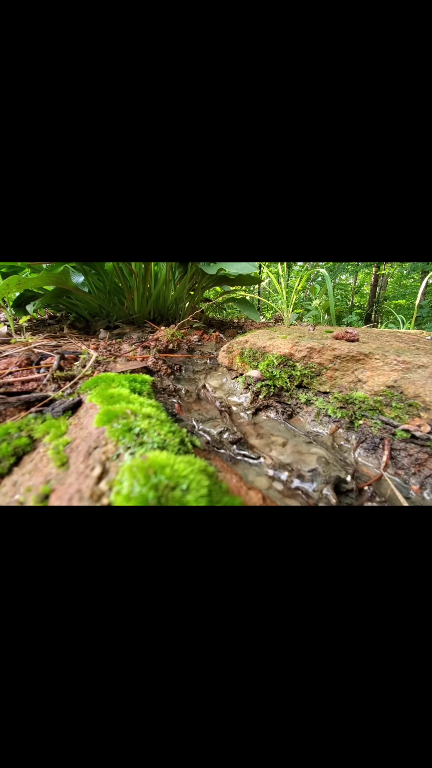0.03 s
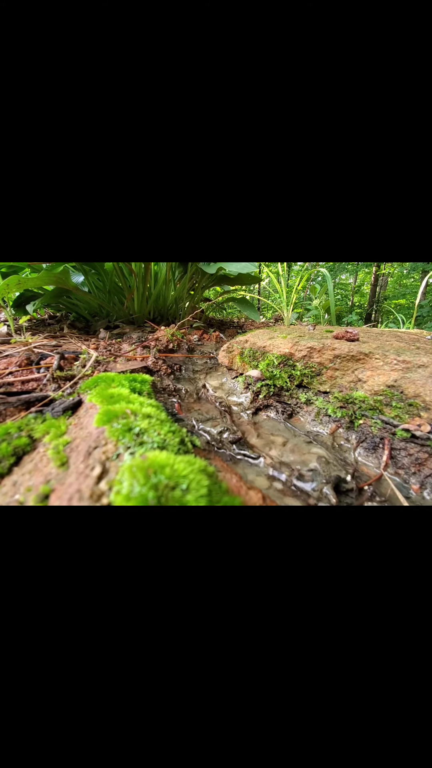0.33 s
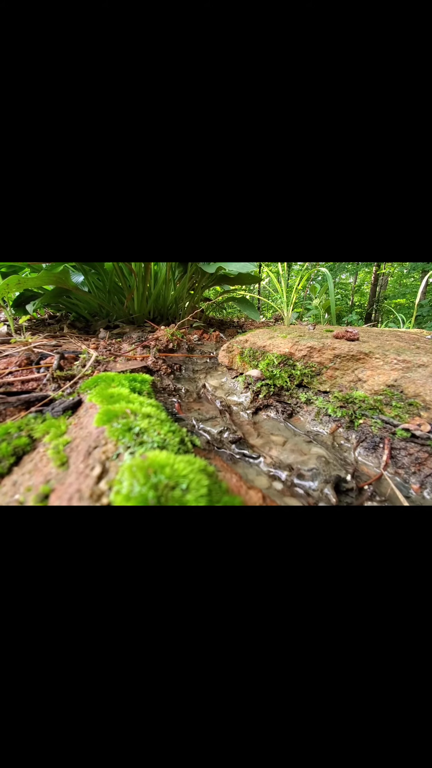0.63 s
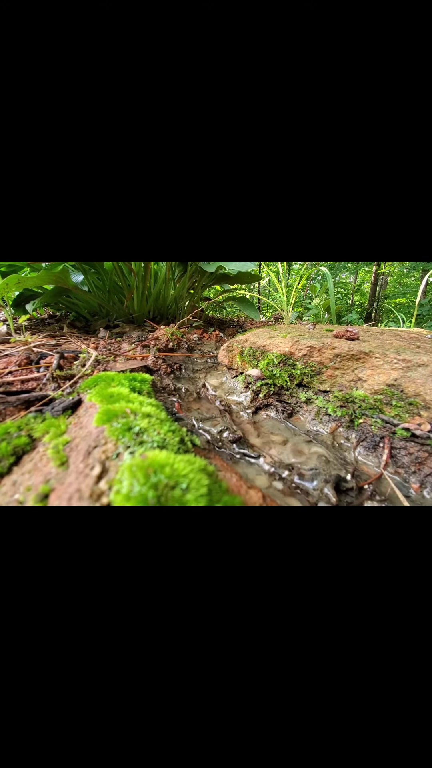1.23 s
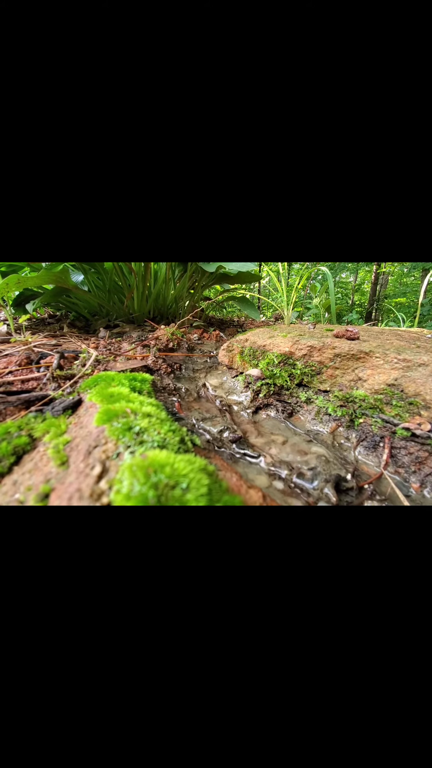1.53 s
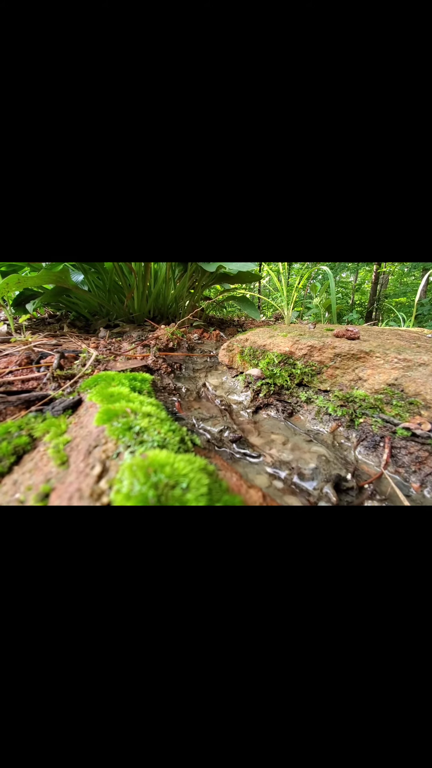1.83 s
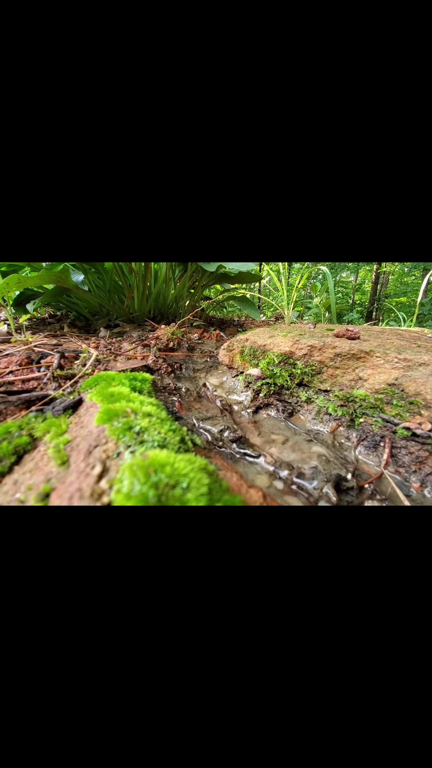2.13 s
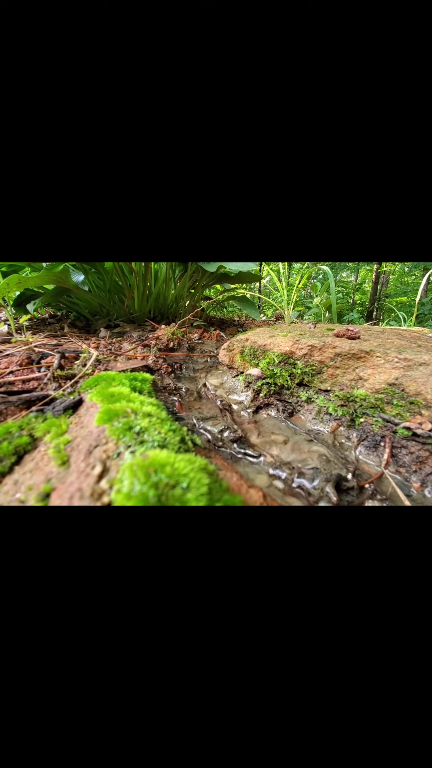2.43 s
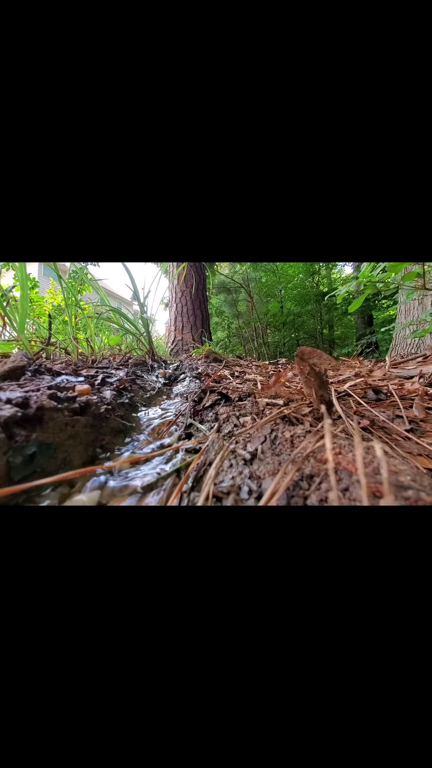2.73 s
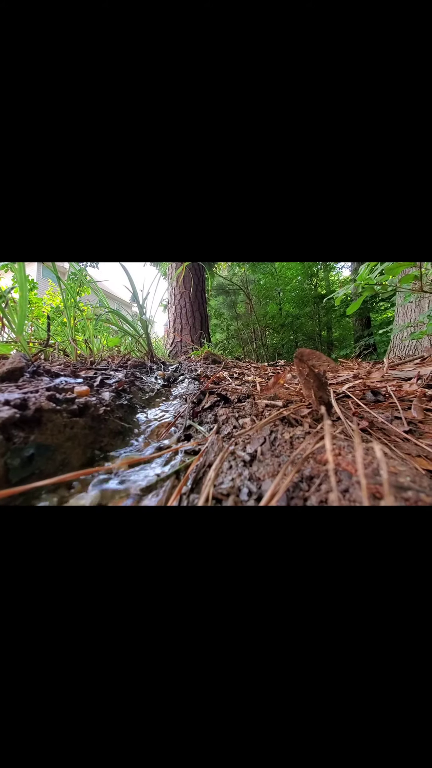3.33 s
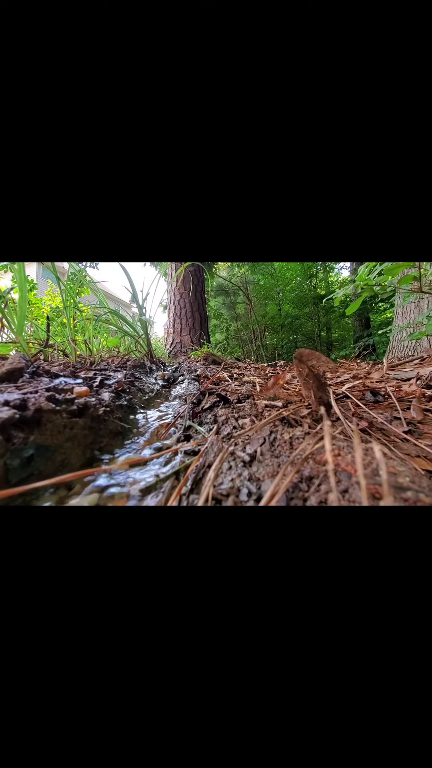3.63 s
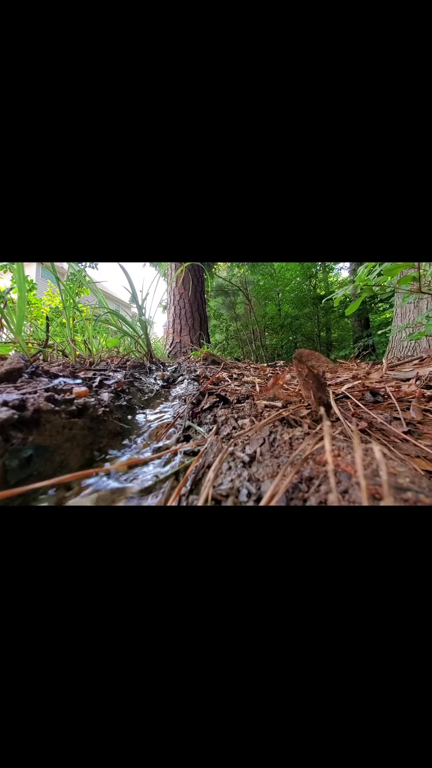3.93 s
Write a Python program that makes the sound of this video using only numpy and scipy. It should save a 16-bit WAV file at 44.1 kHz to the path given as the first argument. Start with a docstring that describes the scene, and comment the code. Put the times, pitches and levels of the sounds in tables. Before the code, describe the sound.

A small stream trickles with a thin hiss, mostly on the left, with a few low glugs and faint drips while light wind buffets the microphone. At about 2.6 seconds the sound drops out for an instant. From 2.7 seconds to the end at 4, water runs into a pool, much louder, with a surging low rumble, hollow gurgles, a few dull slaps and a fine fizz.

```python
"""A mossy stream bank, then the pool below, on a stereo microphone with a short silence between.
At the bank, light wind buffets each port and water hisses thinly over rock; trapped air glugs and
faint chirps sit on the left, small drips on the right. Down by the pool, turbulent flow and air make
a loud, surging rumble with hollow gurgles and dull slaps, under fizz, thin steady tones and the tiny
ticks of bursting spray."""
import sys
import numpy as np
from scipy import signal
from scipy.fft import rfft, irfft
from scipy.io import wavfile

SR = 44100
rng = np.random.default_rng(int(sys.argv[2]) if len(sys.argv) > 2 else 0)


def put_to_file(sound):
    """Save the sound as 16-bit audio at rate SR, in the file named by the first command-line argument."""
    columns = np.atleast_2d(sound).T  # one column per channel
    safe = np.clip(columns, -1, 1)
    whole_steps = np.round(safe * 32767)
    wavfile.write(sys.argv[1], SR, whole_steps.astype(np.int16))


N = 176400
TIME = np.arange(N) / SR


def amp(db):
    """Decibels to gain."""
    return 10 ** (np.asarray(db) / 20)


def unit_rms(x):
    """Scales to rms 1."""
    return x / np.sqrt(np.mean(x ** 2) + 1e-30)


def at_hz(table, hz):
    """Each column of a spectrum table at the given frequencies."""
    freqs, *columns = np.transpose(table)
    return np.array([np.interp(np.log(hz + 1), np.log(freqs), c) for c in columns])


def gain_curve(table):
    """The gain that each dB column of a curve gives at every sample."""
    times, *columns = np.transpose(table)
    return amp([np.interp(TIME, times, c) for c in columns])


def swing_db(table, t):
    """Each level column of a curve at times t, in dB about its mean power."""
    times, *columns = np.transpose(table)
    grid = np.linspace(times[0], times[-1])
    powers = [np.mean(amp(np.interp(grid, times, c)) ** 2) for c in columns]
    return np.array([np.interp(t, times, c) - 10 * np.log10(p) for c, p in zip(columns, powers)])


def colour(x, table):
    """Gives white noise of rms 1 the spectrum of a table."""
    hz = np.fft.rfftfreq(N, 1 / SR)
    return irfft(rfft(x) * amp(at_hz(table, hz)), N) * np.sqrt(SR / 2)


def flutter(rate_hz, channels=1):
    """Smooth random wavering of rms 1, up to about the given rate."""
    hz = np.fft.rfftfreq(N, 1 / SR)
    white = rfft(rng.standard_normal((channels, N)))
    return unit_rms(irfft(white / (1 + (hz / rate_hz) ** 4), N))


def patter(per_s, spread_db, share):
    """White noise for both ports: tiny bursts carry a share of the power, a smooth wash the rest."""
    size = amp(spread_db * np.minimum(rng.exponential(1, (2, N)), 4))
    bursts = size * rng.choice([-1, 1], (2, N)) * (rng.random((2, N)) < per_s / SR)
    return np.sqrt(share) * unit_rms(bursts) + np.sqrt(1 - share) * rng.standard_normal((2, N))


def band_noise(hz, width_hz):
    """A narrow band of noise around a steady or moving pitch, rms 1."""
    a, b = flutter(rate_hz=width_hz / 2, channels=2)
    phase = 2 * np.pi * np.cumsum(hz * np.ones(N)) / SR
    return a * np.cos(phase) + b * np.sin(phase)


def swell(at, half_width):
    """A bell-shaped envelope that peaks at the given time."""
    return np.exp(-((TIME - at) / half_width) ** 2)


def glide(at, half_width, hz, octaves_per_s):
    """A pitch that slides through hz at the given time and holds still well before and after."""
    return hz * 2 ** (octaves_per_s * np.clip(TIME - at, -2 * half_width, 2 * half_width))


def plops(table, cycles):
    """Dull blips that rise and die within a cycle or two."""
    out = np.zeros(N)
    for at, db, hz in table:
        envelope = amp(db) * np.exp(-abs(TIME - at) * hz / cycles)
        out += envelope * np.sin(2 * np.pi * hz * (TIME - at))
    return out


def wind():
    """At the bank, eddies buffet each microphone port separately, the left one harder."""
    # Wind on the ports (frequency [Hz], left [dB per Hz], right [dB per Hz])
    spectrum = [(20, -96, -113), (35.4, -88, -109), (55.6, -74.5, -101), (77, -66.5, -99),
                (114, -72.5, -99), (172, -71.5, -100), (203, -74.5, -100), (280, -76, -80),
                (347, -82.5, -84), (454, -84.5, -84.5), (540, -92, -93.5), (770, -102, -104.5),
                (1100, -116, -118), (2500, -135, -135)]
    # Gusts on each port (time [s], relative level [dB])
    gusts_left = [(0, -54.5), (.10, -51.5), (.15, -58), (.24, -59), (.37, -59.5), (.41, -54), (.49, -57.5),
                  (.55, -58), (.68, -57), (.74, -64.5), (.82, -56.5), (.89, -62.5), (.94, -56),
                  (1.04, -60.5), (1.10, -56), (1.18, -59), (1.35, -59.5), (1.47, -55.5), (1.59, -58.5),
                  (1.64, -57.5), (1.85, -57), (1.97, -51), (2.07, -57), (2.28, -58.5), (2.38, -56),
                  (2.58, -60)]
    gusts_right = [(0.0, -67.5), (0.29, -77), (0.41, -68.5), (0.84, -73), (0.93, -75), (0.95, -66),
                   (1.14, -72), (1.41, -65.5), (1.44, -69.5), (2.05, -65.5), (2.15, -71.5), (2.4, -64),
                   (2.57, -70), (2.58, -77.5)]
    gusts_db = np.vstack([swing_db(gusts_left, TIME), swing_db(gusts_right, TIME)])
    eddies_db = np.array([[1.], [2.2]]) * flutter(rate_hz=53, channels=2)
    balance_db = np.array([[.4], [-.8]])
    return colour(rng.standard_normal((2, N)) * amp(gusts_db + eddies_db + balance_db), spectrum)


def trickle():
    """Left of the microphone, a thin sheet of water hisses over rock; a high sizzle comes and goes."""
    # Water hiss (frequency [Hz], left [dB per Hz], right [dB per Hz])
    hiss_spectrum = [(500, -120, -118), (920, -111.5, -114), (1440, -101, -112.5), (2260, -100, -116),
                     (3320, -99, -119), (4430, -97.5, -124), (5870, -101, -127), (7900, -103, -130),
                     (10200, -109, -124), (11200, -112, -123), (12100, -118, -124), (13800, -123, -125)]
    # Sizzle at 0 dB gain (frequency [Hz], level [dB per Hz])
    sizzle_spectrum = [(3000, -125), (4500, -106), (8500, -109), (9600, -107), (10500, -100.5),
                       (11000, -105), (11700, -100), (12500, -105), (14500, -109)]
    # Swells of the sizzle (time [s], gain [dB])
    sizzle_swells = [(0, -7), (.45, -23), (.7, -9), (.95, -16), (1.1, -14), (1.23, 1.5), (1.54, 0),
                     (1.8, -11), (2.3, -36), (2.44, -21), (2.58, -30)]
    hiss = colour(patter(per_s=3000, spread_db=5.0, share=0.066), hiss_spectrum)
    hiss *= amp(0.4 * flutter(rate_hz=4.5))
    sizzle = colour(rng.standard_normal(N), sizzle_spectrum) * gain_curve(sizzle_swells)
    return hiss + sizzle * amp([[0], [-28]])


def glugs(roughness=0.19):
    """Trapped air gulps at the bank, on the left: each glug swells and fades, most rising in pitch."""
    # Gulps (time [s], half-width [s], pitch [Hz], rise [octaves/s], rms at the crest [dB])
    gulps = [(0.103, 0.012, 194.8, 12.5, -46), (0.446, 0.013, 180, 29.5, -43),
             (.803, 0.023, 140.7, 25.5, -48.5), (.954, 0.0122, 289, 60, -47), (1.813, 0.02, 130.5, 0, -46),
             (2.017, .022, 158.8, 10, -47.5)]
    out = np.zeros(N)
    for at, half_width, hz, rise, db in gulps:
        pitch = glide(at, half_width, hz, rise)
        tone = np.sqrt(2) * np.sin(2 * np.pi * (np.cumsum(pitch) / SR + rng.random()))
        out += amp(db) * swell(at, half_width) * (tone + roughness * band_noise(pitch, width_hz=hz))
    return out * amp([[0], [-21]])


def drips():
    """Small drips blend into the flow at the bank, right of the microphone."""
    # Drops (time [s], envelope peak [dB], pitch [Hz])
    drops = [(.420, -58, 2000), (1.238, -56, 800), (1.400, -57, 784), (1.403, -53, 2700), (1.56, -61, 804),
             (2.136, -52, 650), (2.1866, -54, 2300), (2.189, -52.5, 705), (2.288, -58, 714),
             (2.364, -53, 650), (2.465, -49, 616)]
    return plops(drops, cycles=0.76) * amp([[-8], [0]])


def chirps():
    """Faint, very high squeaks swell and fade at the bank, on the left."""
    # Squeaks (time [s], rms at the crest [dB], half-width [s])
    squeaks = [(.58, -73, 0.022), (0.793, -78, 0.039)]
    envelope = sum(amp(db) * swell(at, half_width) for at, db, half_width in squeaks)
    return envelope * band_noise(hz=12250, width_hz=900) * amp([[0], [-24]])


def rumble(churn_db=0.72):
    """Low turbulence by the pool, alike on both ports in the bass; each register surges on its own."""
    # Flow and air (frequency [Hz], left [dB per Hz], right [dB per Hz])
    spectrum = [(20, -97, -102), (34.2, -68, -73), (54.4, -57, -58.5), (82, -51.5, -51),
                (118.5, -50.5, -50.5), (149, -57.5, -58), (200, -51.5, -51.5), (241, -56, -61),
                (288.5, -53, -52.5), (336, -60, -60), (347, -52, -51.5), (426, -57, -58.5),
                (457.5, -54.5, -54.5), (541, -60.5, -66), (668, -70, -69), (854, -67.5, -73),
                (870, -85, -73.5), (1010, -76, -75.5), (1290, -86.5, -84.5), (1700, -109, -101),
                (3000, -120, -118)]
    # Surges in relative level (time [s], bass [dB], low middle [dB], middle [dB], top [dB])
    surges = [(2.68, -33, -39, -47, -74), (2.708, -34, -34.5, -46, -60), (2.914, -28, -32, -38.5, -60.5),
              (3.002, -34, -30, -52.5, -62.5), (3.06, -34, -37, -48, -67.5),
              (3.236, -32.5, -28, -53.5, -61), (3.302, -28.5, -28, -45, -63.5), (3.37, -27, -34, -45, -55),
              (3.382, -33, -32, -45, -51), (3.406, -29.5, -24.5, -46, -55),
              (3.468, -32, -32.5, -51.5, -61.5), (3.628, -33, -35.5, -46, -56), (3.668, -35, -32, -42, -55),
              (3.892, -36.5, -35, -49.5, -59), (3.958, -37.5, -29, -55, -55.5), (3.98, -41, -39, -48, -60)]
    # Centres of those four registers (frequency [Hz])
    register_hz = [120, 370, 740, 1150]
    # Likeness of the two ports (frequency [Hz], correlation [-1..1])
    port_likeness = [(100, 1), (210, 0.97), (300, 0.89), (480, 0.9), (600, 0.48), (760, 0.099),
                     (950, -0.41), (1250, -0.25), (2000, -0.8)]
    hz, t, (left, unrelated) = signal.stft(rng.standard_normal((2, N)), SR, nperseg=1024, noverlap=768)
    likeness = np.clip(at_hz(port_likeness, hz).T, -1, 1)
    right = likeness * left + np.sqrt(1 - likeness ** 2) * unrelated
    # Neighbouring registers crossfade along the frequency axis.
    weights = at_hz(np.column_stack([register_hz, np.eye(len(register_hz))]), hz)
    surging = np.array([left, right]) * amp(weights.T @ swing_db(surges, t))
    flow = signal.istft(surging, SR, nperseg=1024, noverlap=768)[1][:, :N]
    return colour(flow * amp(churn_db * flutter(rate_hz=36)), spectrum)


def fizz(rise_db_per_s=1.4, unity_at_s=3.565):
    """Water runs into the pool with a fine, slowly growing hiss and one narrow ring on the left."""
    # Fizz at 0 dB gain (frequency [Hz], left [dB per Hz], right [dB per Hz])
    spectrum = [(700, -105, -103), (1450, -91, -90), (1930, -96.5, -92), (2380, -92, -94.5),
                (3520, -98, -94.5), (5200, -100.5, -96.5), (6900, -103, -96), (7900, -103, -103),
                (8600, -103, -110), (9400, -108, -115), (10460, -109, -107), (12200, -115, -98),
                (13300, -115, -103), (14300, -123, -118)]
    gain_db = rise_db_per_s * (TIME - unity_at_s) + 0.37 * flutter(rate_hz=38)
    ring = band_noise(hz=8130, width_hz=220) * amp(-72.5 + 0.5 * flutter(rate_hz=31))
    hiss = colour(patter(per_s=2500, spread_db=0.5, share=0.094), spectrum)
    return (hiss + ring * amp([[0], [-14]])) * amp(gain_db)


def tones(waver_hz=4.22):
    """Faint, slightly wavering whistles hang over the pool."""
    # Whistles (pitch [Hz], left rms [dB], right rms [dB])
    whistles = [(1276, -79, -78), (1523, -82, -81), (2460, -86, -85), (2697, -78, -75), (3750, -91, -87),
                (5216, -85, -80), (6094, -87, -79)]
    out = np.zeros((2, N))
    for hz, left_db, right_db in whistles:
        pitch = hz + waver_hz * flutter(rate_hz=10.5)
        out += amp([[left_db], [right_db]]) * np.sqrt(2) * np.sin(2 * np.pi * np.cumsum(pitch) / SR)
    return out


def spray(hz=12400, width_hz=1700, decay_s=0.00051):
    """Droplets burst over the pool, right of the microphone, in very short, very high ticks."""
    # Bursts (time [s], peak before panning [dB])
    bursts = [(2.749, -56), (3.022, -53.5), (3.0853, -45.5), (3.206, -55), (3.488, -56), (3.6674, -45),
              (3.893, -53)]
    envelope = sum(amp(db) * np.exp(-abs(TIME - at) / decay_s) for at, db in bursts)
    pitch = hz + width_hz / 2 * flutter(rate_hz=2500)
    return envelope * np.sin(2 * np.pi * np.cumsum(pitch) / SR) * amp([[-9], [1.5]])


def gurgles(width_share=0.23):
    """Brief hollow resonances swell out of the rumble, dead centre, most sinking in pitch."""
    # Resonances (time [s], half-width [s], pitch [Hz], slide [octaves/s], rms at the crest [dB])
    resonances = [(2.839, 0.1, 774.7, -0.5, -46.5), (3.232, 0.07, 330.2, -5.5, -29.5),
                  (3.365, 0.052, 558, 0, -38), (3.372, 0.075, 184.6, -2.5, -30.5),
                  (3.674, 0.051, 445, -0.5, -36), (3.962, 0.059, 88.7, 1.5, -31)]
    out = np.zeros(N)
    for at, half_width, hz, slide, db in resonances:
        pitch = glide(at, half_width, hz, slide)
        out += amp(db) * swell(at, half_width) * band_noise(pitch, hz * width_share)
    return out


def slaps():
    """Water slaps dully into the pool, a little left of centre."""
    # Impacts (time [s], envelope peak [dB], pitch [Hz])
    impacts = [(3.150, -22, 443), (3.541, -19.5, 417), (3.621, -27, 500), (3.806, -22, 355)]
    return plops(impacts, cycles=0.8) * amp([[0], [-1.5]])


def scene():
    """Two microphone positions: on the bank, then, after a moment of near silence, by the pool."""
    # The bank fades out (time [s], gain [dB])
    bank_fade = [(2.604, -0.5), (2.608, -16), (2.62, -27), (2.66, -64)]
    # The pool fades in (time [s], rumble gain [dB], fizz gain [dB])
    pool_fade = [(2.612, -80, -60), (2.626, -48, -32), (2.650, -43, -25), (2.659, -35, -7), (2.662, 1.5, 0),
                 (2.69, 0, 0)]
    rumble_in, fizz_in = gain_curve(pool_fade)
    bank = wind() + trickle() + drips() + chirps() + glugs()
    pool_lows = rumble() + gurgles() + slaps()
    pool_highs = fizz() + tones() + spray()
    return bank * gain_curve(bank_fade) + pool_lows * rumble_in + pool_highs * fizz_in


def record(dry):
    """A very short closing fade and the recorder's band limit."""
    fade_s, edge_hz = .004, 14550
    fade = np.sin(np.pi / 2 * np.minimum((TIME[-1] - TIME) / fade_s, 1)) ** 2
    lowpass = signal.firwin(511, edge_hz, window=("kaiser", 9), fs=SR)
    return signal.oaconvolve(dry * fade, lowpass[None], "same")


dry = scene()
out = record(dry)
put_to_file(out)
```